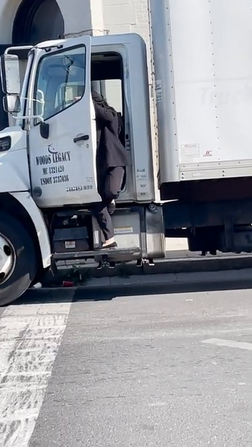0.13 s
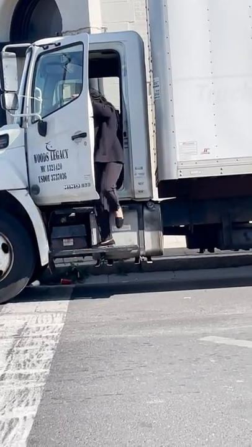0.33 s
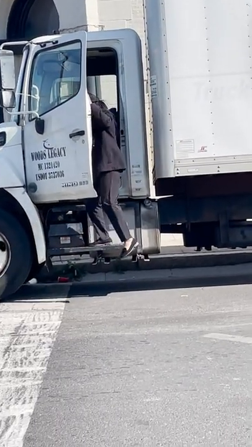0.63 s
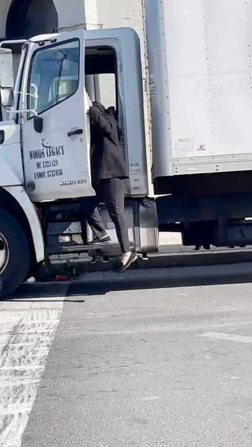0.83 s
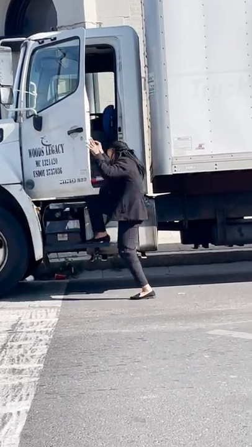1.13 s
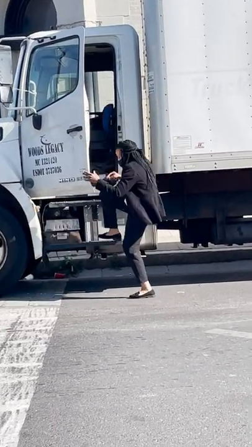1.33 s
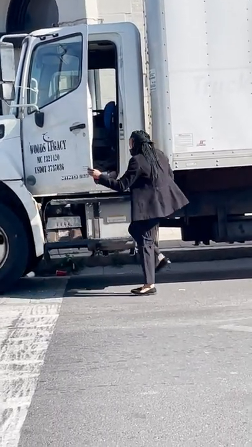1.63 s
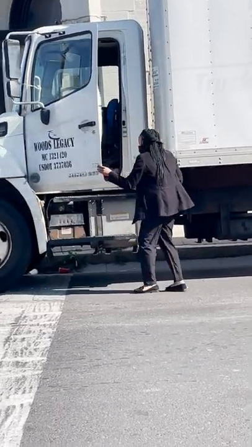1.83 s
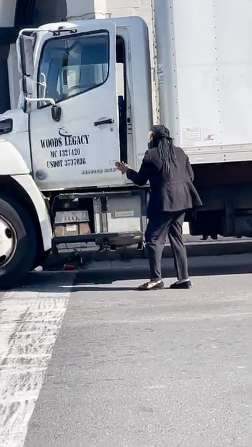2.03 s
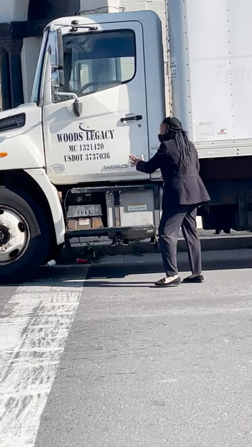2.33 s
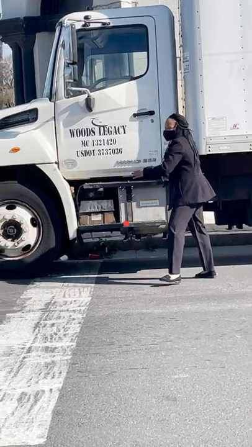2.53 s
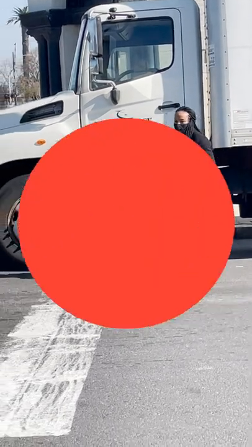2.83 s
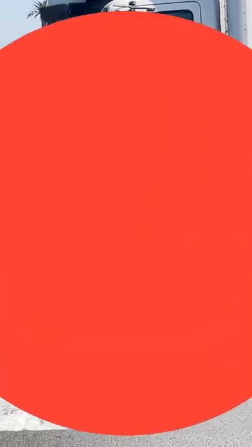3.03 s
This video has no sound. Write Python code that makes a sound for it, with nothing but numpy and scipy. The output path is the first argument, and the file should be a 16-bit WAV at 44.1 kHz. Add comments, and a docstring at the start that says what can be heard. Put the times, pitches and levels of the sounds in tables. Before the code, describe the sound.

A truck cab door slams hard near the end, cracking, booming and rattling, after shoes scuff and land and a metal step groans; low diesel idle and distant traffic, stereo microphone a few metres away outdoors.

```python
"""An idling rumble on a street comes first; shoes then tap and scuff a few metres from the microphone.
Cloth swishes, light metal clinks and the cab step groans as someone climbs down from a truck.
The door then slams: contacts crack noise and ring the skin, the cab thuds and booms, fittings rattle on.
Steady sounds are coloured noise and timed pulses; struck ones are noise bursts and decaying sines.
The near sounds return from the walls as a diffuse tail."""
import sys
import numpy as np
from scipy import signal
from scipy.fft import rfft, irfft
from scipy.io import wavfile

SR = 44100
rng = np.random.default_rng(int(sys.argv[2]) if len(sys.argv) > 2 else 0)


def transcribe(u):
    """Save the signal u as a 16-bit wav file named by the first command-line argument.

    u: samples, shape (n,) or (channels, n), limited to [-1, 1]; the rate is SR.
    q: integer samples, one column per channel.
    """
    v = np.clip(np.atleast_2d(u).T, -1, 1)
    q = np.round(v * 32767).astype(np.int16)
    wavfile.write(sys.argv[1], SR, q)


N = 141120  # 3.2 s


def undb(db):
    """Amplitude factor from decibels."""
    return 10 ** (np.asarray(db) / 20)


def since(start=0):
    """Seconds since a moment, zero before it."""
    return np.maximum(np.arange(N) / SR - start, 0)


def gains(points):
    """Gain at every frequency, interpolated over log frequency from (frequency [Hz], level [dB])."""
    hz, db = np.array(points, float).T
    bins_hz = np.arange(N // 2 + 1) * SR / N
    return undb(np.interp(np.log(bins_hz + 1), np.log(hz), db))


def noise(colour, width):
    """Stereo noise of rms 1, made from a coloured mid and a side set against it by the width."""
    mid, side = rfft(rng.standard_normal((2, N))) * gains(colour)
    side = side * gains(width)
    out = irfft(np.array([mid + side, mid - side]), N)
    return out / out.std()


def decay(t, t60):
    """Exponential fall by 60 dB in each t60."""
    return np.exp(-np.log(1000) * t / t60)


def strike(start, rise, t60):
    """Envelope of a blow: quick rise and exponential fall."""
    t = since(start)
    return (1 - np.exp(-t / rise)) * decay(t, t60)


def damped(modes, t60):
    """Modes (frequency [Hz], level [dB]) given one shared decay time."""
    return [(hz, db, t60) for hz, db in modes]


def ring(modes, start, rise):
    """Decaying sines set going at one moment, followed for one second."""
    t = since(start)
    live = (t > 0) & (t < 1)
    t, out = t[live], np.zeros(N)
    tones = sum(undb(db) * decay(t, t60) * np.sin(2 * np.pi * hz * t) for hz, db, t60 in modes)
    out[live] = (1 - np.exp(-t / rise)) * tones
    return out


def dull(x, hz):
    """Two-pole low-pass."""
    return signal.sosfilt(signal.butter(2, min(hz, SR / 2 - 1), fs=SR, output="sos"), x)


def lows(x, hz):
    """Low part of a sound, filtered forwards and backwards so that it keeps its timing."""
    return dull(dull(x, hz)[..., ::-1], hz)[..., ::-1]


def fade(x, start, rise, t60, treble_t60, split_hz=2800):
    """A tail whose treble has its own decay."""
    low = lows(x, split_hz)
    return low * strike(start, rise, t60) + (x - low) * strike(start, rise, treble_t60)


def convolve(x, response):
    """Play a sound through a response."""
    return signal.fftconvolve(x, response, axes=-1)[..., :N]


CHATTER_PER_S, CHATTER_SPREAD_DB, CHATTER_T60_S = 400, 3.5, 0.04


def chatter():
    """Level of a loose part that touches many times a second, each touch with its own strength."""
    chance, size = rng.random(N), rng.standard_normal(N)
    touches = (chance < CHATTER_PER_S / SR) * undb(CHATTER_SPREAD_DB * size) ** 2
    power = np.abs(convolve(touches, undb(-60 * since() / CHATTER_T60_S) ** 2))
    return np.sqrt(power / power.mean())


# Colour of the distant street wash: (frequency [Hz], relative density [dB per Hz])
STREET_WASH = [(30, -31), (45, 1), (96, -3), (160, -9.5), (300, -15.5), (500, -21.5), (850, -20),
               (1500, -27), (2300, -35.5), (3500, -47), (5300, -61), (7500, -78.5), (11000, -67.5),
               (14000, -91)]
# Stereo spread of far sound at the microphone: (frequency [Hz], side against mid [dB])
FAR_SPREAD = [(60, -43.5), (150, -31), (330, -17.5), (650, -9), (1300, -5.5), (5000, -13)]
WASH_DB = -39.5
RUMBLE_HZ, RUMBLE_WAVER_DB, WASH_DRIFT_DB = 200, .9, .5  # upper edge of rumble; typical level swings


def traffic():
    """A wash of engines and tyres as noise: the rumble wavers, the rest drifts slowly."""
    wash = noise(STREET_WASH, FAR_SPREAD)
    rumble = lows(wash, RUMBLE_HZ)
    waver = RUMBLE_WAVER_DB * signal.resample(rng.standard_normal(size=32), N)
    drift = WASH_DRIFT_DB * signal.resample(rng.standard_normal(size=12), N)
    return undb(WASH_DB) * (rumble * undb(waver) + (wash - rumble) * undb(drift))


# Resonances of the exhaust: (frequency [Hz], relative level [dB], t60 [s])
EXHAUST_MODES = [(61, 8, 0.038), (96, 1.5, 0.16)]
FIRING_HZ, FIRING_DB = 31.15, -47
FIRING_SCATTER_DB, FIRING_JITTER = -0.5, 0.031  # strength; timing as a share of a period


def idle():
    """Uneven diesel firings, as single pulses, throb in the resonances of the exhaust."""
    count = int(FIRING_HZ * N / SR)
    late, size = rng.standard_normal((count, 2)).T
    times = (np.arange(count) + FIRING_JITTER * late) / FIRING_HZ
    pulses = np.zeros(N)
    pulses[(times * SR).astype(int) % N] = undb(FIRING_SCATTER_DB * size)
    throb = convolve(pulses, ring(EXHAUST_MODES, 0, 0.00095))
    return undb(FIRING_DB) * throb / throb.std()


STREET_DB, STREET_DELAY_S, STREET_RISE_S = -16.5, 0.034, 0.037
STREET_T60_S, STREET_TREBLE_T60_S = 0.95, 0.58


def street(x):
    """Late, diffuse reflections from the walls: the sound played through a decaying noise tail."""
    white = noise([(20, 0), (20000, 0.0072)], FAR_SPREAD)
    tail = fade(white, STREET_DELAY_S, STREET_RISE_S, STREET_T60_S, STREET_TREBLE_T60_S)
    tail = tail / np.sqrt(np.sum(tail ** 2) / 2)  # unit energy per channel on average
    return undb(STREET_DB) * convolve(x.mean(0)[None], tail)


# Sleeves brush the seat and door frame: (time [s], level [dB])
SLEEVE_BRUSHES = [(.24, -70.5), (.68, -68.5), (1.36, -70), (2.29, -74)]
# Colour of cloth: (frequency [Hz], relative level [dB])
CLOTH_COLOUR = [(1200, -1), (3200, 5), (5500, -6), (7600, -20), (13000, -22)]
# Stereo spread of near sound, here and below: (frequency [Hz], side against mid [dB])
NEAR_SPREAD = [(100, -38), (300, -32), (600, -22), (1400, -19.5), (10000, 7.5)]
BRUSH_S = 0.082  # from the peak of a swish to 1/e of its level


def clothes():
    """Soft swishes of cloth: noise made grainy by many small touches."""
    swishes = sum(undb(db) * np.exp(-((since() - s) / BRUSH_S) ** 2) for s, db in SLEEVE_BRUSHES)
    return noise(CLOTH_COLOUR, NEAR_SPREAD) * chatter() * swishes


# Shoes on the cab step and the road: (time [s], level [dB], t60 [s])
SOLE_SCUFFS = [(0.18, -47, 0.038), (0.212, -47.5, 0.078), (1.021, -50.5, 0.11), (1.191, -39.5, 0.22),
               (1.572, -46.5, 0.1), (1.647, -54, 0.084), (1.958, -42, 0.14), (2.128, -55.5, .1)]
# Colour of the soles: (frequency [Hz], relative level [dB])
SOLE_COLOUR = [(150, 11), (600, 12), (1300, 5), (2100, 4.5), (3000, 0.5), (4200, -5.5), (5500, -7),
               (7500, -31.5), (11000, -23), (15000, -52)]
# Knock of the heel: (frequency [Hz], level [dB], t60 [s])
HEEL_KNOCK = [(530, -22, 0.015)]
SCUFF_RISE_S = 0.00054
LANDING_S, HEEL_DB, HEEL_T60_S = 1.1926, -28.5, 0.0091


def shoes():
    """Soles scuff as noise bursts and one heel lands hard: a tick, then a ringing knock."""
    scuffs = sum(undb(db) * strike(s, SCUFF_RISE_S, t60) for s, db, t60 in SOLE_SCUFFS)
    tick = undb(HEEL_DB) * strike(LANDING_S, .0001, HEEL_T60_S)
    knock = ring(HEEL_KNOCK, LANDING_S + 0.00194, 0.001)
    return noise(SOLE_COLOUR, NEAR_SPREAD) * (scuffs + tick) + knock


# Small metal clinks: (time [s], pitch [Hz], level [dB])
METAL_CLINKS = [(0.213, 2900, -48.5), (1.223, 2420, -50), (1.223, 3130, -51), (1.225, 5220, -57.5),
                (1.348, 5230, -63.5), (2.127, 5950, -65.5)]
CLINK_WIDTH, CLINK_T60_S = 0.036, 0.072  # width as a share of the pitch


def clinks():
    """Light touches on metal, each a short burst of noise in a narrow band about its pitch."""
    out, step = 0, 1 + CLINK_WIDTH
    for s, hz, db in METAL_CLINKS:
        band = [(hz / step ** 5, -50), (hz / step, -6), (hz, 0), (hz * step, -6), (hz * step ** 5, -50)]
        out = out + undb(db) * noise(band, NEAR_SPREAD) * strike(s, SCUFF_RISE_S, CLINK_T60_S)
    return out


# The metal step groans as the weight leaves it: (time [s], length [s], pitch [Hz], level [dB])
STEP_GROANS = [(1.219, 0.02, 400, -38.5), (1.262, 0.046, 406, -39), (1.351, 0.069, 388.7, -39.5)]
GROAN_EDGE_S, GROAN_LOW_HZ, GROAN_LOW_DB = 0.0034, 135, -1.5  # low mode is relative to the upper
GROAN_WOBBLE, GROAN_ROUGH_HZ = 0.02, 160  # typical share of pitch; low-pass on the level flutter


def groans():
    """The step flexes and hums on two modes, with unsteady pitch and rough level."""
    wobble = 1 + GROAN_WOBBLE * signal.resample(rng.standard_normal(size=700), N)
    turns = 2 * np.pi * np.cumsum(wobble) / SR  # phase of a 1 Hz mode
    low = undb(GROAN_LOW_DB) * np.sin(GROAN_LOW_HZ * turns)
    out = 0
    for s, length, hz, db in STEP_GROANS:
        swell = (1 - np.exp(-since(s) / GROAN_EDGE_S)) * np.exp(-since(s + length) / GROAN_EDGE_S)
        out = out + undb(db) * swell * (np.sin(hz * turns) + low)
    return out * dull(chatter(), GROAN_ROUGH_HZ)


# Knocks of the loose fittings: (time [s], chatter level [dB], metal ring level [dB])
FITTING_KNOCKS = [(2.478, -35, -28), (2.507, -38, -42), (2.534, -33.5, -46), (2.555, -41, -47),
                  (2.611, -40, -34), (2.634, -34, -41), (2.658, -42, -40.5), (2.689, -38, -48),
                  (2.742, -42, -52), (2.890, -48.5, -57)]
# Colour of the chatter: (frequency [Hz], relative level [dB])
RATTLE_COLOUR = [(200, 10.5), (900, 5.5), (2200, -10.5), (2800, -2.5), (3500, -6), (4900, -10),
                 (7500, -26.5), (11500, -32), (15000, -44)]
# Modes of window frame and mirror arm: (frequency [Hz], relative level [dB])
FITTING_MODES = [(1012, -8.5), (1168, -3), (1486, -3.5), (1685, -4.5), (1938, -10.5), (2186, -16),
                 (2552, -19.5), (2982, -13.5)]
RATTLE_RISE_S, RATTLE_T60_S = 0.0011, 0.099
FITTING_T60_S, FITTING_SCATTER_DB, FITTING_DETUNE = 0.095, 1.5, 0.007  # detune as a share of pitch


def fittings():
    """Window, mirror and latch chatter in bursts; each knock rings their metal in its own way."""
    power = sum((undb(db) * strike(s, RATTLE_RISE_S, RATTLE_T60_S)) ** 2 for s, db, _ in FITTING_KNOCKS)
    out = noise(RATTLE_COLOUR, NEAR_SPREAD) * chatter() * np.sqrt(power)
    for s, _, ring_db in FITTING_KNOCKS:
        chance = rng.standard_normal((len(FITTING_MODES), 2))
        modes = [(hz * (1 + FITTING_DETUNE * a), db + FITTING_SCATTER_DB * b)
                 for (hz, db), (a, b) in zip(FITTING_MODES, chance)]
        out = out + undb(ring_db) * ring(damped(modes, FITTING_T60_S), s, RATTLE_RISE_S)
    return out


# Dead thuds of door and cab against seal and mounts: (time [s], pitch [Hz], level [dB])
BODY_THUDS = [(2.4335, 294, -8.5), (2.4347, 133, -9.5), (2.4662, 66, -11.5), (2.4674, 261, -20),
              (2.4702, 149, -19.5), (2.4871, 113.6, -9.5), (2.5262, 276.4, -9.5), (2.552, 122.5, -12.5),
              (2.575, 337, -20.5), (2.633, 137, -21), (2.686, 95, -23.5)]
# Colour of the air and body boom: (frequency [Hz], relative level [dB])
BOOM_COLOUR = [(25, -18), (45, 7.5), (120, 10), (175, 9.5), (230, -6), (500, -53)]
THUD_CYCLES = 12.2  # cycles for a thud to fall 60 dB
BOOM_S, BOOM_DB, BOOM_RISE_S, BOOM_T60_S = 2.464, -17, 0.0029, 0.67
CRACK_RISE_S = 0.00075  # rise of thuds, cracks and panel ring


def cab():
    """The body takes up the blow: deep, heavily damped sines and a late, dense boom of noise."""
    thuds = sum(ring([(hz, db, THUD_CYCLES / hz)], s, CRACK_RISE_S) for s, hz, db in BODY_THUDS)
    boom = noise(BOOM_COLOUR, NEAR_SPREAD) * strike(BOOM_S, BOOM_RISE_S, BOOM_T60_S)
    return thuds + undb(BOOM_DB) * boom


# Door meets latch, striker and frame, then rebounds:
# (time [s], crack level [dB], low-pass [Hz], panel ring level [dB])
DOOR_CONTACTS = [(2.421, -13, 1000, -50), (2.430, -19, 4000, -51), (2.4336, -13.5, 8850, -23.5),
                 (2.477, -21.5, 4000, -40.5), (2.49, -25.5, 8000, -44), (2.527, -25.5, 3000, -31.5)]
# Colour of the crack: (frequency [Hz], relative level [dB])
CRACK_COLOUR = [(60, -2), (150, -12), (330, 2), (800, -4.5), (1100, -16.5), (1600, -4.5), (2000, -14.5),
                (2850, -12.5), (3600, -24), (4700, -16), (7000, -36), (12000, -26.5), (15000, -37)]
# Modes of the door skin: (frequency [Hz], relative level [dB])
SKIN_MODES = [(245, -15), (273, 0), (332, -2.5), (358, -0.5), (389, -3), (443, -12), (534, -17),
              (572, -17.5), (648, -9.5), (712, -19), (784, -9.5)]
# Colour of the dense shiver of the sheet metal: (frequency [Hz], relative level [dB])
SHIVER_COLOUR = [(100, 1.5), (300, 6), (600, -5.5), (1000, -9), (1650, -7), (2300, -13), (3600, -19),
                 (5000, -16), (7000, -26.5), (12000, -35), (15000, -45)]
CRACK_T60_S, SKIN_T60_S = 0.05, 0.3
SHIVER_DB, SHIVER_T60_S, SHIVER_TREBLE_T60_S = -15, 0.8, 0.37  # level against the crack


def door():
    """Each contact cracks, rings the skin and leaves the sheet metal shivering."""
    out = 0
    for s, db, dull_hz, ring_db in DOOR_CONTACTS:
        crack = noise(CRACK_COLOUR, NEAR_SPREAD) * strike(s, CRACK_RISE_S, CRACK_T60_S)
        shiver = noise(SHIVER_COLOUR, NEAR_SPREAD)
        shiver = fade(shiver, s, CRACK_RISE_S, SHIVER_T60_S, SHIVER_TREBLE_T60_S)
        skin = ring(damped(SKIN_MODES, SKIN_T60_S), s, CRACK_RISE_S)
        out = out + undb(db) * dull(crack + undb(SHIVER_DB) * shiver, dull_hz) + undb(ring_db) * skin
    return out


# Balance of the near sounds: (frequency [Hz], left over right [dB])
NEAR_BALANCE = [(120, .1), (280, .4), (600, 3), (1200, 1.8), (2000, -.3)]


def scene():
    """The truck stands a little to the left, in front of the walls and the traffic."""
    lean = np.sqrt(gains(NEAR_BALANCE))  # half the difference on each side
    near = clothes() + shoes() + clinks() + groans() + fittings() + cab() + door()
    near = irfft(rfft(near) * np.array([lean, 1 / lean]), N)
    return traffic() + idle() + street(near) + near


# Lead of the left microphone port over the right: (frequency [Hz], phase [rad])
PORT_LEAD = [(1400, 0), (2500, .6), (5500, .8), (9500, -.8), (13000, -2.4)]
LOW_CUT_HZ, TOP_HZ = 40.7, 13000


def record(dry):
    """The two microphone ports differ in treble phase; the deepest bass and the top are cut."""
    lead = np.interp(np.arange(N // 2 + 1) * SR / N, *np.array(PORT_LEAD, float).T)
    ports = irfft(rfft(dry) * np.exp(.5j * np.array([lead, -lead])), N)
    ports = signal.sosfilt(signal.butter(4, LOW_CUT_HZ, "high", fs=SR, output="sos"), ports)
    return signal.sosfilt(signal.ellip(8, .2, 70, TOP_HZ, fs=SR, output="sos"), ports)


dry = scene()
out = record(dry)
transcribe(out)
```